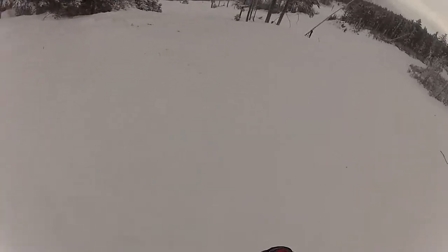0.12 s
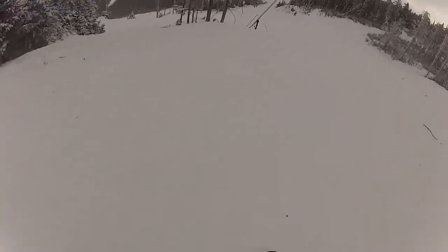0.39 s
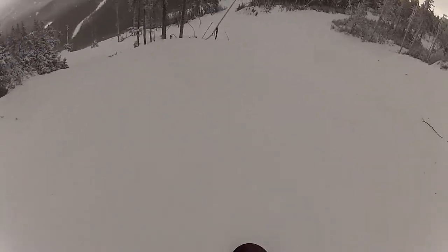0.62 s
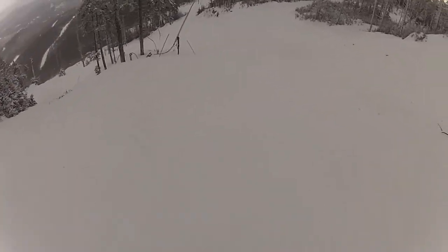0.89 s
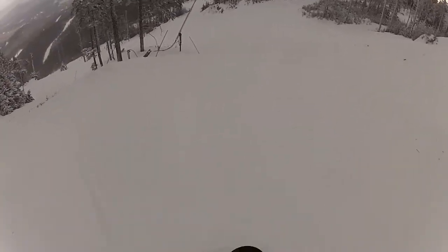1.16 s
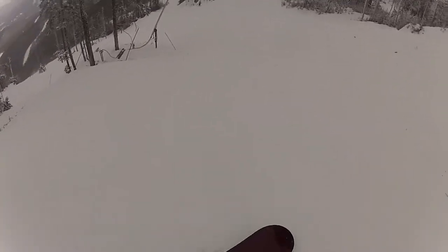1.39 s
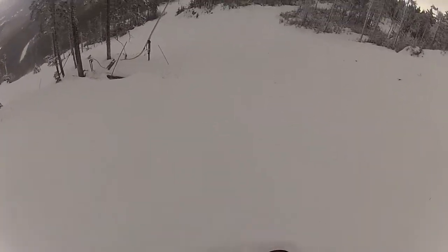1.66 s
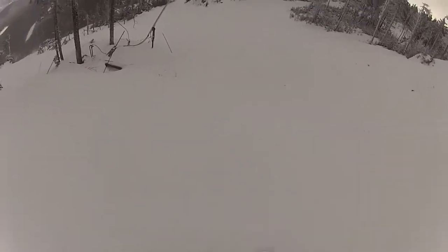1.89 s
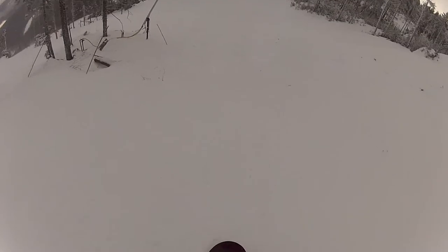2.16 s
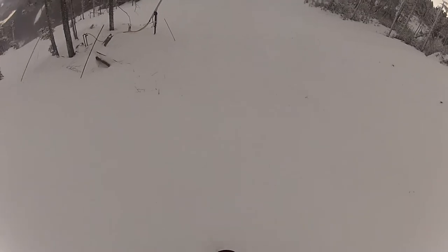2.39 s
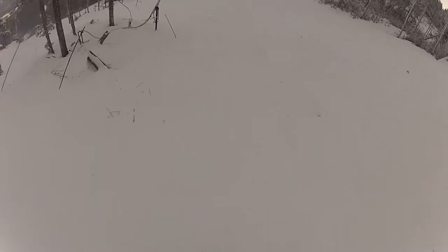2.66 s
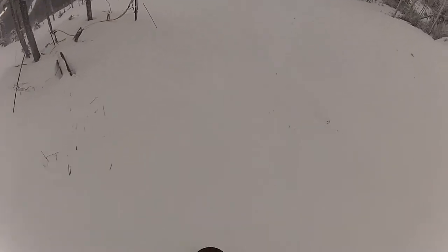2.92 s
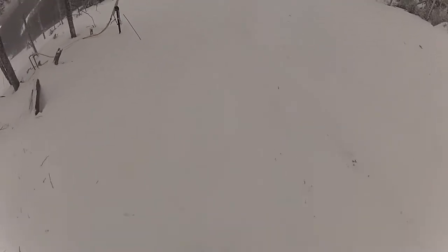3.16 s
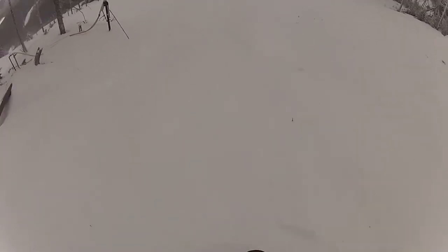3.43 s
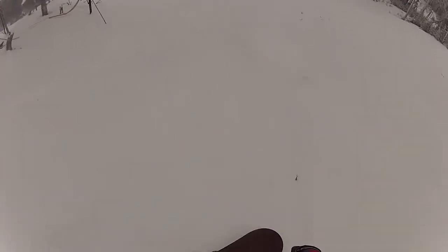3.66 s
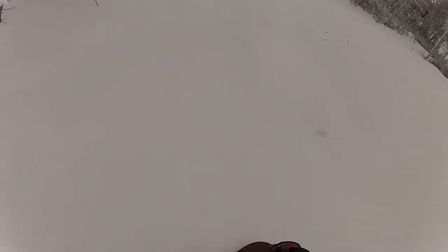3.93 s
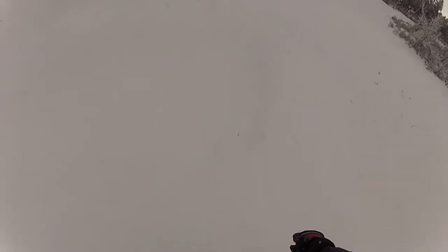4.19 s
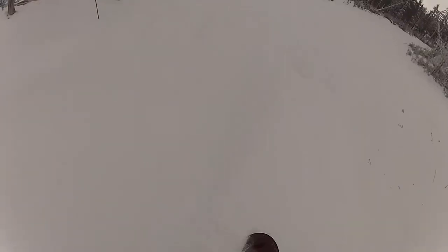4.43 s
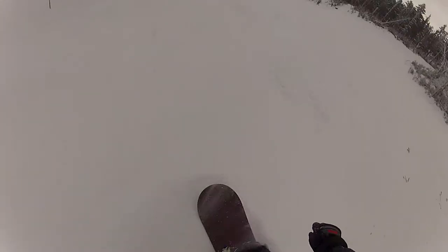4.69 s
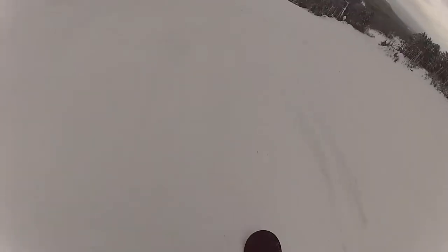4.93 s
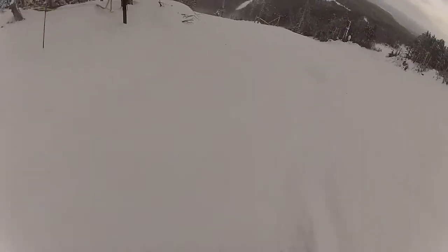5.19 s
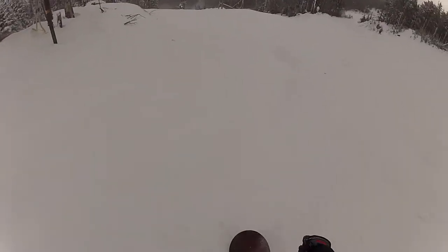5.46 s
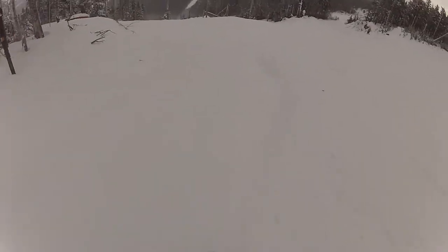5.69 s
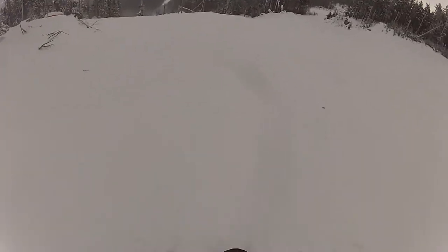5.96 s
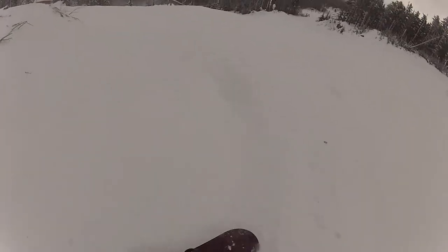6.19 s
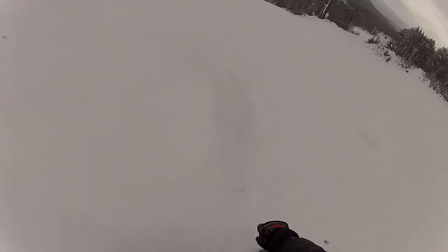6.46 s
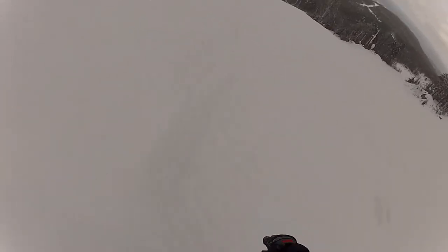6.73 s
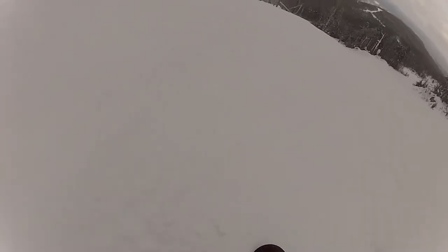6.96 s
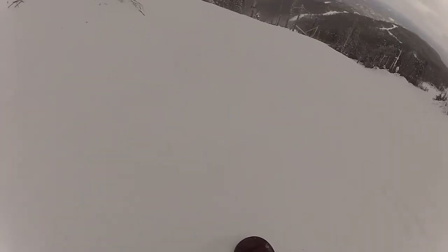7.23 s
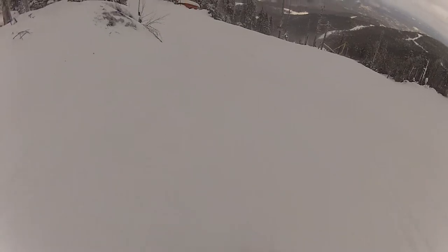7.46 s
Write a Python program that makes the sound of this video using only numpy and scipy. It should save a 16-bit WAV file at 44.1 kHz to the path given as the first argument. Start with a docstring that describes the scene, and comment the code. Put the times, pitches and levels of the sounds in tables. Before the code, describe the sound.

Snowboard carving powder on a slope: grainy snow hiss swells in turns under lumpy, overloading wind buffets and clicking housing rattles.

```python
"""On a wooded slope, a snowboard rides through powder, heard from a small camera sealed in its housing.
Wind buffets the microphone: shaped noise whose strength comes in lumps, with single pressure bumps on top.
The board's edge throws up snow: hiss plus many tiny ringing grains, swelling in each turn.
Knocks and scrapes shake the mount and ring the housing, a set of resonances.
The camera samples slowly, clips loud peaks and repeats each sample, which mirrors low sound into the treble."""
import sys
import numpy as np
from scipy import signal
from scipy.fft import rfft, irfft
from scipy.io import wavfile
from scipy.ndimage import uniform_filter1d

SR = 44100
rng = np.random.default_rng(int(sys.argv[2]) if len(sys.argv) > 2 else 0)


def generate_wav(sig):
    """Save sig (samples, or channels by samples) to the path in sys.argv[1] as 16-bit PCM at SR."""
    pcm = np.round(np.clip(np.atleast_2d(sig).T, -1, 1) * 32767).astype(np.int16)
    wavfile.write(sys.argv[1], SR, pcm)


def gain_from_decibels(decibels):
    """Convert decibel values to linear amplitude factors."""
    exponent = np.asarray(decibels, float) / 20
    return 10 ** exponent


N = 335160


def rms_one(x):
    """Scale a signal so that its rms is 1."""
    return x / np.sqrt(np.mean(x ** 2) + 1e-20)


def coloured(x, spectrum):
    """Shape a signal to a spectrum drawn on a log-frequency axis; rms 1."""
    pitch_hz, level_db = np.transpose(spectrum)
    log_hz = np.log(np.fft.rfftfreq(N, 1 / SR) + 1)
    gain_db = np.interp(log_hz, np.log(pitch_hz), level_db, left=-60, right=-80)
    return rms_one(irfft(rfft(x) * gain_from_decibels(gain_db), N))


def drift(rate_hz):
    """Slow chance: noise through a double one-pole low-pass, run in for half a second; rms 1."""
    r = np.exp(-2 * np.pi * rate_hz / SR)
    noise = rng.standard_normal(N + SR // 2)
    return rms_one(signal.lfilter([1], [1, -2 * r, r * r], noise)[SR // 2:])


def resonance(x, pitch_hz, width_hz):
    """Something that rings at one pitch: a two-pole resonance with gain about 1 at its top."""
    r = np.exp(-np.pi * width_hz / SR)
    turn = 2 * np.pi * pitch_hz / SR
    return signal.lfilter([(1 - r * r) / 2, 0, (r * r - 1) / 2], [1, -2 * r * np.cos(turn), r * r], x)


def swells(peak_s, rise_s, fall_s, peak_db):
    """Summed power of swells; the strength of each rises and falls in straight lines."""
    coarse = np.arange(0, N, 32)   # every 32nd sample is enough for slow shapes
    t = coarse / SR - peak_s[:, None]
    shape = np.clip(np.minimum(1 + t / rise_s[:, None], 1 - t / fall_s[:, None]), 0, 1)
    return np.interp(np.arange(N), coarse, gain_from_decibels(2 * peak_db) @ shape ** 2)


def wind(spectrum, lumps_db):
    """Eddies breaking over the microphone port: noise whose strength comes in lumps."""
    return coloured(rng.standard_normal(N) * gain_from_decibels(lumps_db), spectrum)


# How the ride goes, joined by straight lines: start_s, wind_db (on the port),
# small_eddies_db (relative to wind_db), glide_db (steady hiss of the board), fine_db (extra treble of the spray)
RIDE_COURSE = [(0.0, -22, 3, -44.5, 0), (0.19, -18.5, -10.5, -46, -13), (0.34, -23.5, 2, -45.5, 0),
               (0.55, -16, 3, -37, 2.5), (0.93, -14, -1, -38.5, -0.5), (1.3, -22, 1.5, -36, -1),
               (1.45, -18, -4.5, -38.5, -6), (1.84, -30, 4.5, -43.5, 3.5), (2.0, -23.5, -7.5, -46.5, 1),
               (2.45, -26.5, -0.5, -46.5, 6.5), (2.52, -9, -8, -46, 3), (2.939, -8.5, -8.5, -45.5, 1),
               (3.15, -13.5, -4, -48, 8.5), (3.42, -15.5, -2.5, -39.5, -3), (3.8, -20, -2.5, -44.5, 3),
               (3.9, -10, -6.5, -49, -13), (4.23, -16, -5.5, -43, -0.5), (4.5, -22, 0.5, -43.5, 6),
               (4.6, -19.5, -6, -43.5, -16), (4.9, -25, -7.5, -48, -2), (5.29, -16.5, -9.5, -41, -22),
               (5.52, -26.5, -7, -49.5, -24), (6.1, -20.5, -2.5, -44, -21), (6.54, -18.5, -5.5, -46.5, 1),
               (6.75, -24.5, -4, -49.5, -5), (6.82, -18.5, -3.5, -40.5, 4.5), (7.41, -23.5, -7, -50, -3),
               (7.6, -24.5, -11, -37.5, 10)]


def ride_course():
    """The slowly changing levels of wind, small eddies, board hiss and spray treble."""
    start_s, *columns = np.transpose(RIDE_COURSE)
    return [np.interp(np.arange(N) / SR, start_s, column) for column in columns]


# Turns in which the edge throws up snow: peak_s, rise_s, fall_s, spray_db, jolt_db (relative to spray_db)
CARVED_TURNS = [(0.08, .06, 0.11, -42.5, 13), (0.69, .12, 0.097, -24, 11), (0.79, .05, 0.042, -29, 16.5),
                (1.04, .06, 0.18, -33.5, 21.5), (1.18, 0.056, 0.058, -29, 17),
                (1.27, 0.067, 0.047, -28, 15), (1.4, 0.18, 0.086, -33, 21.5), (1.48, 0.048, 0.059, -31, 15),
                (1.67, 0.052, 0.032, -29.5, 15), (1.802, .08, 0.022, -31.5, 12),
                (2.11, 0.053, 0.057, -40.5, 13.5), (2.24, 0.036, 0.016, -39, 16),
                (2.331, 0.012, 0.051, -42.5, 25), (3.24, 0.11, .05, -39, 27), (3.47, 0.024, 0.066, -33, 24),
                (3.53, 0.069, 0.044, -33, 22), (3.66, 0.013, 0.032, -32, 6), (3.89, 0.027, 0.15, -36.5, 23),
                (4.002, 0.0068, 0.17, -33, 15), (4.298, 0.057, 0.021, -35, 25.5),
                (4.395, 0.074, 0.061, -27, 13), (4.445, 0.078, 0.021, -30.5, 20),
                (5.009, 0.047, 0.24, -35.5, 18.5), (5.16, 0.053, 0.14, -32.5, 23),
                (5.25, 0.084, 0.01, -33.5, 14), (6.18, 0.013, 0.044, -50.5, 26),
                (6.334, 0.017, 0.1, -33.5, 17), (6.42, 0.091, 0.11, -40.5, 18),
                (6.618, 0.027, 0.01, -51, 34.5), (7.0, 0.13, 0.063, -36.5, 19.5),
                (7.068, 0.034, 0.055, -34.5, 21), (7.46, 0.014, 0.052, -37, 8),
                (7.559, 0.13, 0.038, -42, 24.5)]


def carved_turns():
    """Power of the thrown-up snow, and of the air that the rider's jolt stirs at the port."""
    peak_s, rise_s, fall_s, spray_db, jolt_db = np.transpose(CARVED_TURNS)
    thrown = swells(peak_s, rise_s, fall_s, spray_db)
    jolts = swells(peak_s, rise_s, fall_s, spray_db + jolt_db)
    return thrown, jolts


# Shape of the deep wind noise: pitch_hz, level_db (per Hz, relative)
RUMBLE_SHAPE = [(15, 3), (30, -9), (60, 0), (100, -1), (170, -4), (280, -16), (500, -34)]
# Deep gusts: peak_s, length_s, level_db
DEEP_GUSTS = [(0.809, 0.26, -6.5), (1.67, 0.092, -15.5), (2.411, 0.079, -13), (3.184, .06, -23),
              (3.274, 0.05, -3), (3.494, 0.11, -7), (3.576, 0.058, -7.5), (3.638, 0.056, -12),
              (3.905, 0.17, -7.5), (4.32, 0.15, -11), (5.077, 0.15, -14), (5.247, .08, -9),
              (6.108, .12, -14.5), (6.326, 0.047, -11.5), (6.43, 0.14, -19), (6.694, 0.073, -20),
              (7.13, 0.11, -15)]


def rumble(wind_db, gusts, eddies):
    """Large eddies: deep noise that follows the wind and swells in each deep gust."""
    peak_s, length_s, level_db = np.transpose(DEEP_GUSTS)
    power = gain_from_decibels(2 * wind_db) + swells(peak_s, length_s / 2, length_s / 2, level_db)
    return np.sqrt(power) * wind(RUMBLE_SHAPE, 0.84 * gusts + 0.13 * eddies)


# Shape of the buffeting: pitch_hz, level_db (per Hz, relative)
BUFFET_SHAPE = [(80, -21), (160, -5.5), (250, 0), (380, -4), (520, -14), (800, -26)]


def buffet(small, jolts, gusts, eddies):
    """Small eddies and jolts: low noise in very uneven lumps."""
    lumps_db = 0.71 * gusts + 3.24 * eddies + 0.86 * drift(49.0)
    return np.sqrt(small + jolts) * wind(BUFFET_SHAPE, lumps_db)


# Shape of the flutter: pitch_hz, level_db (per Hz, relative)
FLUTTER_SHAPE = [(250, -33), (420, -3), (520, 0), (680, -3), (790, -9.5), (900, -21.5), (1300, -31.5)]


def flutter(small, jolts, gusts, eddies):
    """A higher, fainter noise at the port, driven by the same small eddies and jolts."""
    under_eddies_db, under_jolt_db = 7, 6.5
    power = small * gain_from_decibels(-2 * under_eddies_db) + jolts * gain_from_decibels(-2 * under_jolt_db)
    lumps_db = 2.2 * gusts + 2.07 * eddies + 0.5 * drift(30.0)
    return np.sqrt(power) * wind(FLUTTER_SHAPE, lumps_db)


# Shape of the spray before its treble is adjusted: pitch_hz, level_db (per Hz, relative)
SPRAY_SHAPE = [(500, -14), (900, 2), (1400, -0.5), (2300, 3), (2900, 1.5), (3500, -9), (4600, -10.5),
               (5300, -14), (5950, -19)]


def spray(snow, fine_db, gusts, eddies):
    """Snow torn up by the edge: hiss plus clumped grains that each ring a few cycles at their own pitch."""
    grains_per_s, spread_db, cycles = 3000.0, 2.6, 5.9
    crunch_db, patchy_db = -4.5, 2.4
    lumps_db = 1.0 * gusts + 1.0 * eddies + 1.3 * drift(40.0)
    sizes = gain_from_decibels(spread_db * np.minimum(rng.exponential(1, N), 5)) * rng.choice([-1, 1], N)
    grains = sizes * (rng.random(N) < grains_per_s * gain_from_decibels(lumps_db) / SR) + 1e-18
    pitches_hz = np.geomspace(900, 5400, 12)
    dealt = rng.integers(0, len(pitches_hz), N)   # which pitch each grain gets
    crunch = np.zeros(N)
    for k, hz in enumerate(pitches_hz):
        ringing = rms_one(resonance(grains * (dealt == k), hz, hz / cycles))
        crunch += np.sqrt(hz) * gain_from_decibels(patchy_db * drift(15.0)) * ringing   # each pitch swells on its own
    hiss = rng.standard_normal(N) * gain_from_decibels(lumps_db)
    raw = coloured(hiss + gain_from_decibels(crunch_db) * rms_one(crunch), SPRAY_SHAPE)
    top = signal.sosfilt(signal.butter(4, 3840, "high", fs=SR, output="sos"), raw)
    # the treble grows by a further 0.31 dB for each dB that the snow gets louder
    bright_db = -3.5 + fine_db + 0.31 * (10 * np.log10(snow) + 39)
    return np.sqrt(snow) * (raw + (gain_from_decibels(bright_db) - 1) * top)


# Pitches at which the housing rings (its modes): pitch_hz, width_hz, level_db (relative)
HOUSING_MODES = [(660, 69, 16), (1220, 34, -9), (1640, 190, -5.5), (2340, 540, -1), (2846, 130, -3.5),
                 (3636, 80, -6.5), (4360, 720, -1.5)]


def mode_gains(level_db, centre_hz, db_per_octave):
    """Strength of each housing mode for each contact: favours modes near its centre, varied by chance."""
    pitch_hz, width_hz, mode_db = np.transpose(HOUSING_MODES)
    chance_db = rng.normal(0, 2.5, (len(level_db), len(pitch_hz)))
    octaves_away = np.abs(np.log2(pitch_hz / centre_hz[:, None]))
    return gain_from_decibels(level_db[:, None] + mode_db + chance_db - db_per_octave * octaves_away)


# Knocks of the mount: start_s, level_db (relative), centre_hz, thud_db (relative to level_db)
MOUNT_KNOCKS = [(0.0391, -18.5, 1990, -15), (0.0836, -23.5, 2000, 2), (1.299, -16.5, 2240, 9.5),
                (1.322, -27, 2340, 15), (1.3472, -13, 2340, 6), (1.4006, -13, 2000, -11),
                (1.475, -28, 2340, 20.5), (1.543, -22, 2340, 3), (1.6274, -18.5, 2900, 2),
                (3.2213, -20, 2000, -8), (3.461, -18, 1640, -12), (3.536, -16, 2820, -4),
                (3.5955, -19.5, 2800, -2.5), (3.766, -28, 3600, 1), (3.8804, -11.5, 1870, -6),
                (3.946, -22, 2520, -11), (3.971, -21, 1400, 7), (3.9993, -17, 3100, 2),
                (4.015, -21.5, 3600, -8), (4.077, -21.5, 1640, -11), (4.31, -26, 2000, 0),
                (4.65, -28, 2340, 4), (4.928, -27.5, 2790, 3), (4.96, -29, 4360, -6),
                (5.137, -15, 2190, -8), (5.24, -23, 1640, 3), (5.253, -36, 2340, -15),
                (5.8027, -31, 2080, 6), (6.1855, -19, 2520, 2.5), (6.208, -30, 2340, -6),
                (6.25, -32, 2340, 7), (6.3312, -18.5, 2070, 6), (6.343, -46, 2340, -2),
                (6.6885, -21.5, 1890, -2), (7.0663, -35, 2090, -9), (7.415, -35.5, 2310, 3)]


def knocks():
    """Each knock is one blow that rings the housing, damped by the padded contact, plus a dull thud."""
    thud_hz, ring_boost_db, damping_hz = 580.0, 34.7, 150.0
    start_s, level_db, centre_hz, thud_db = np.transpose(MOUNT_KNOCKS)
    at = np.round(start_s * SR).astype(int)
    gains = mode_gains(level_db + ring_boost_db, centre_hz, 13.3)
    out = np.zeros(N)
    for k, (hz, width_hz, _) in enumerate(HOUSING_MODES):
        damped_hz = width_hz + damping_hz
        blows = np.full(N, 1e-18)
        blows[at] = gains[:, k] * (-1) ** k * 2 * damping_hz / damped_hz
        softened = resonance(blows, hz, 3.0 * damping_hz + width_hz)
        out += resonance(resonance(softened, hz, damped_hz), hz, damped_hz)
    blows = np.full(N, 1e-18)
    blows[at] = gain_from_decibels(level_db + thud_db) * SR / thud_hz
    thud = resonance(resonance(blows, thud_hz, 1.26 * thud_hz), thud_hz, 1.26 * thud_hz)
    return out + resonance(thud, thud_hz, 0.33 * thud_hz)


# The edge biting harder snow: start_s, length_s, level_db (relative), centre_hz
EDGE_SCRAPES = [(0.648, 0.071, -30.5, 1640), (1.141, 0.1, -34, 2900), (1.652, 0.034, -32, 2600),
                (3.485, 0.045, -63, 2300), (4.363, 0.12, -32.5, 660), (4.368, 0.052, -40, 2340),
                (1.314, 0.054, -33, 2340), (5.002, 0.027, -44, 2340), (5.144, 0.05, -34.5, 1220),
                (5.21, 0.061, -33, 1220), (7.439, 0.06, -35, 2340), (7.493, 0.055, -36, 1220),
                (7.501, 0.12, -48.5, 2846), (7.533, 0.022, -33.5, 660)]


def scrapes():
    """The edge bites harder snow: dense uneven slips shake the mount and keep its modes ringing."""
    slips_per_s, fade_s = 600.0, 0.013
    start_s, length_s, level_db, centre_hz = np.transpose(EDGE_SCRAPES)
    t = np.arange(N) / SR
    gains = mode_gains(level_db, centre_hz, 8.0)
    since_start, until_end = t - start_s[:, None], (start_s + length_s)[:, None] - t
    on = np.clip(np.minimum(since_start, until_end) / fade_s, 0, 1)
    slips = rng.standard_normal(N) * (rng.random(N) < slips_per_s / SR) + 1e-18
    out = np.zeros(N)
    for (hz, width_hz, _), gain in zip(HOUSING_MODES, gains.T):
        ringing = resonance(resonance(slips, hz, width_hz), hz, 1.3 * width_hz)
        out += gain @ on * rms_one(ringing)
    return out


# Single strong eddies: peak_s, level_db (relative)
EDDY_SLAPS = [(0.868, 8.5), (2.541, -3.5), (2.584, 4), (2.625, 4.5), (2.66, 0), (2.685, 2), (2.756, 6.5),
              (2.829, -1.5), (2.957, -1.5), (3.074, -9.5), (3.14, 1), (3.179, 0.5), (3.265, 0.5),
              (4.263, -17), (6.441, -2.5)]


def slaps():
    """Single strong eddies: a pressure bump with a dip on either side, often high enough to overload."""
    width_s, boost_db = 0.00166, 1.0
    peak_s, level_db = np.transpose(EDDY_SLAPS)
    t = (np.arange(N) / SR - peak_s[:, None]) / width_s
    return gain_from_decibels(level_db + boost_db) @ ((1 - t * t) * np.exp(-t * t / 2))


def scene():
    """Wind and spray share the same gusts and fast eddies, so they swell together; bumps are added."""
    wind_db, small_db, glide_db, fine_db = ride_course()
    thrown, jolts = carved_turns()
    small = gain_from_decibels(2 * (wind_db + small_db))   # power of the small eddies
    snow = gain_from_decibels(2 * glide_db) + thrown   # power of glide and turns together
    gusts, eddies = drift(8.6), drift(70.0)
    air = rumble(wind_db, gusts, eddies) + buffet(small, jolts, gusts, eddies)
    air += flutter(small, jolts, gusts, eddies)
    bumps = knocks() + scrapes() + slaps()
    return (air + spray(snow, fine_db, gusts, eddies) + bumps)[None]


def top_cut(x):
    """Nothing passes above the cut-off."""
    return signal.sosfilt(signal.butter(12, 16320, fs=SR, output="sos"), x)


def record(dry):
    """Lopsided capsule, slow sampling with hard overload, each sample repeated, then the rate is changed."""
    slow_rate_hz, repeats, cutoff_hz = 12000, 4, 15600
    squared = dry[0] ** 2
    bent = dry[0] + 0.02 * (squared - uniform_filter1d(squared, size=4410))
    slow = np.clip(signal.resample(bent, N * slow_rate_hz // SR), -1, 1)
    # the steps carry mirror images around the slow rate
    held = signal.resample(np.repeat(slow, repeats), N)
    low_pass = signal.cheby2(12, 60, cutoff_hz + 500, fs=SR, output="sos")
    cut = signal.sosfilt(low_pass, held)
    return top_cut(np.clip(cut, -1, 1)[None])


dry = scene()
out = record(dry)
generate_wav(out)
```